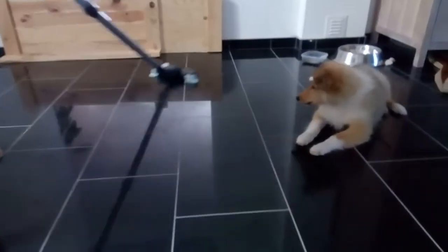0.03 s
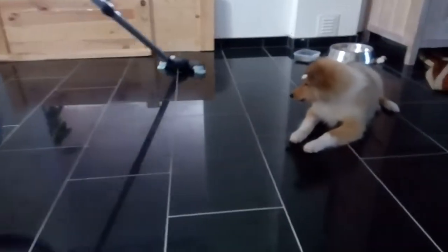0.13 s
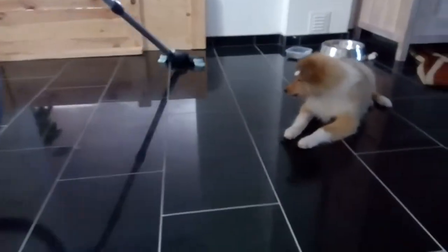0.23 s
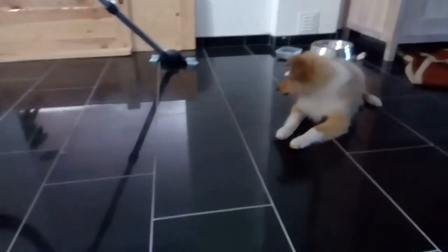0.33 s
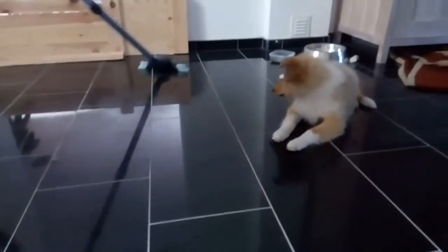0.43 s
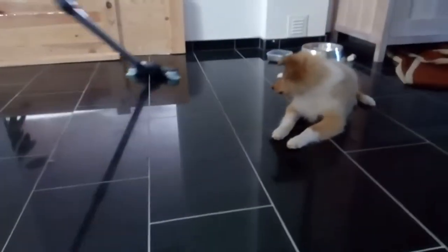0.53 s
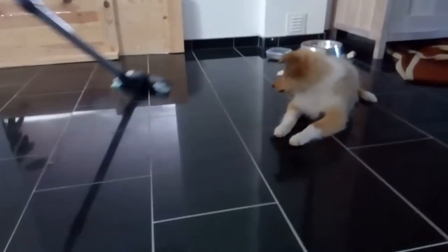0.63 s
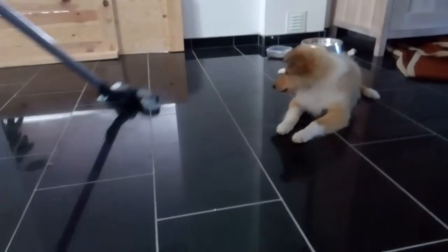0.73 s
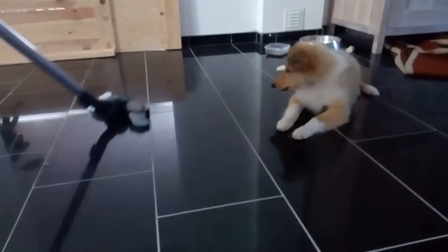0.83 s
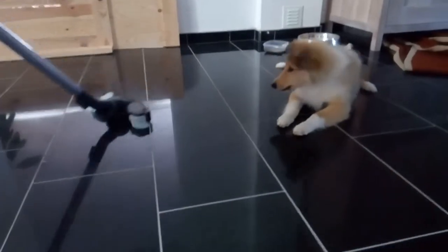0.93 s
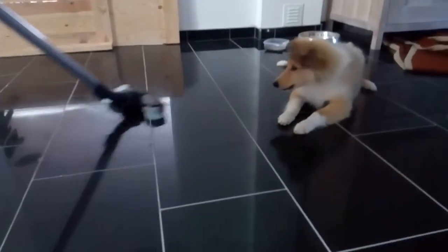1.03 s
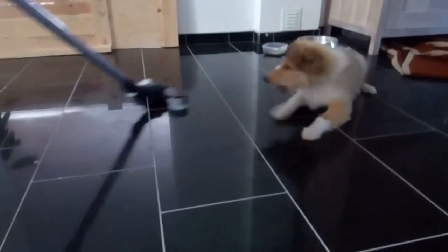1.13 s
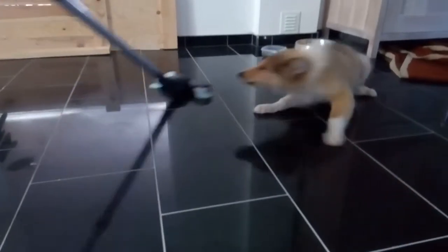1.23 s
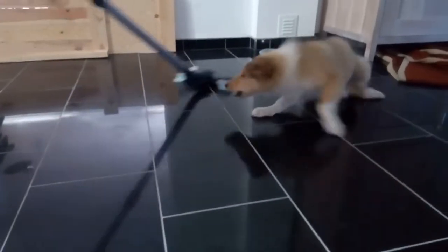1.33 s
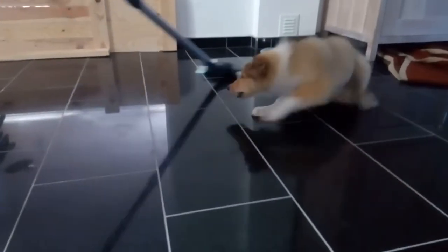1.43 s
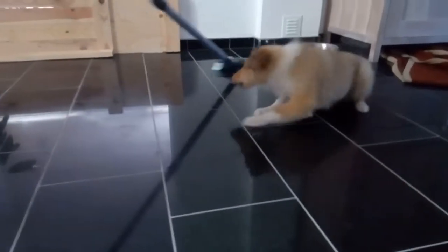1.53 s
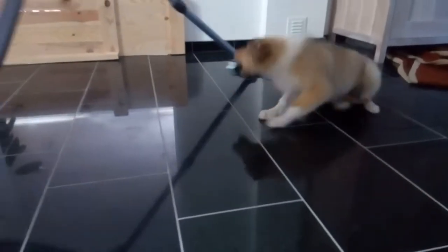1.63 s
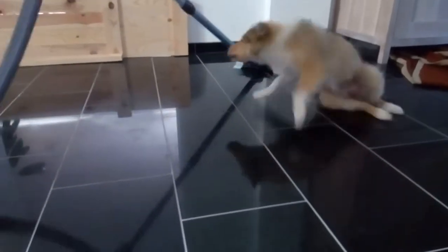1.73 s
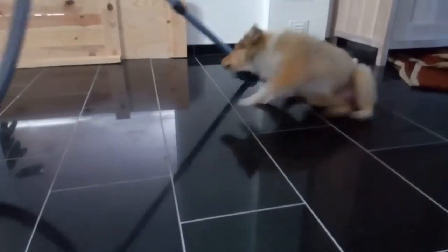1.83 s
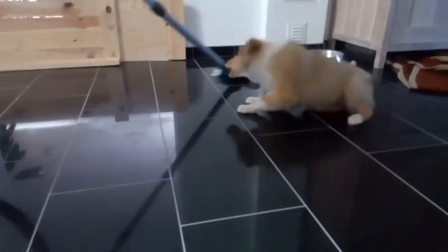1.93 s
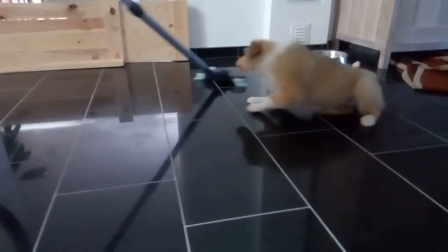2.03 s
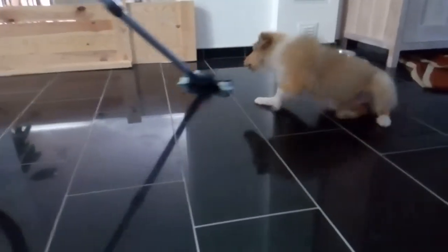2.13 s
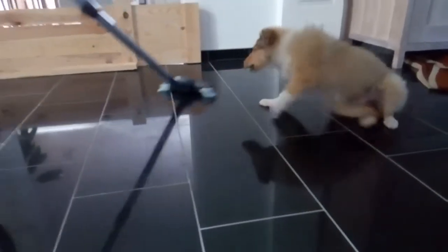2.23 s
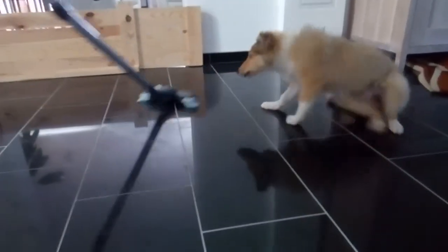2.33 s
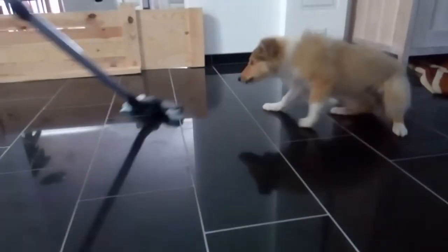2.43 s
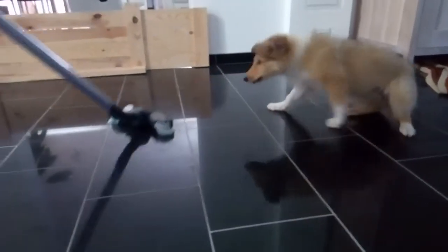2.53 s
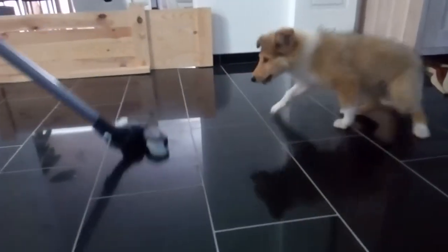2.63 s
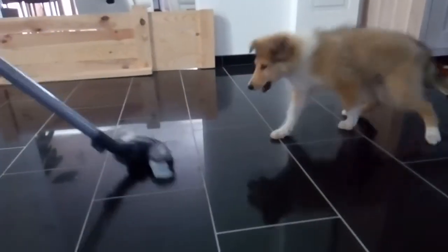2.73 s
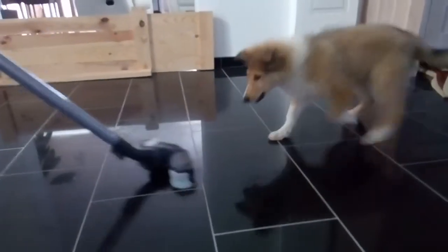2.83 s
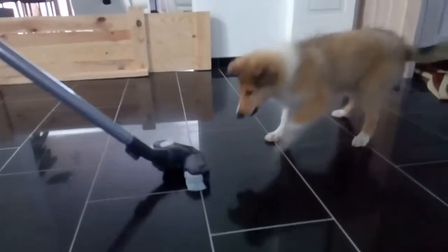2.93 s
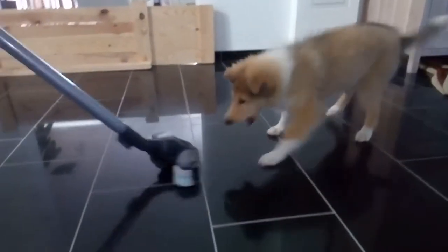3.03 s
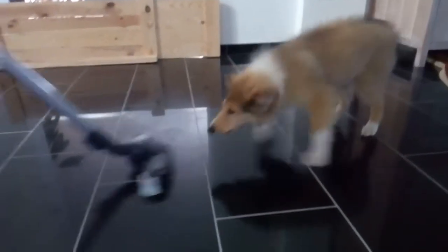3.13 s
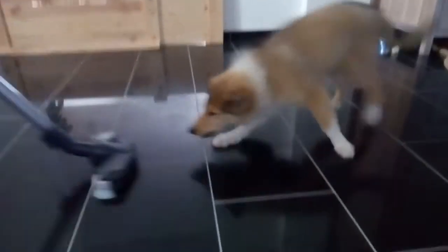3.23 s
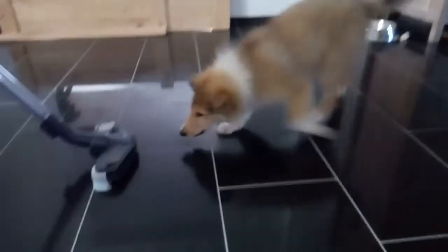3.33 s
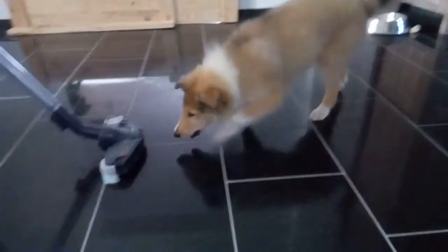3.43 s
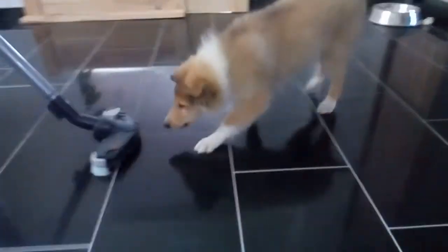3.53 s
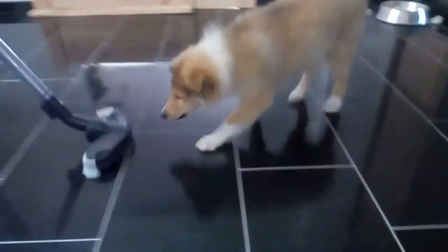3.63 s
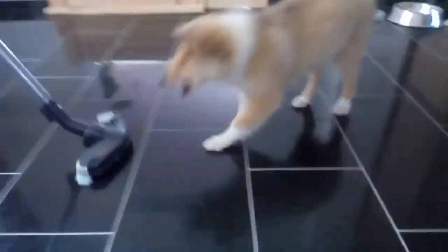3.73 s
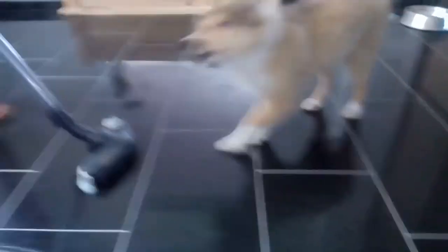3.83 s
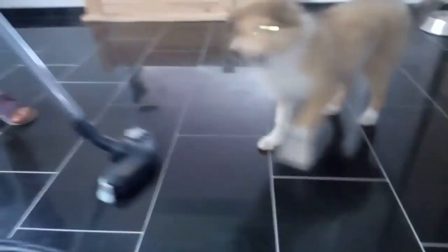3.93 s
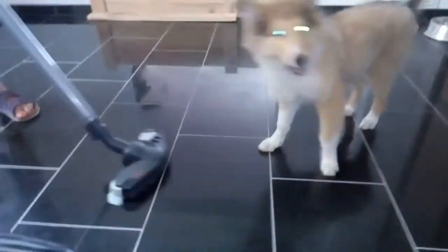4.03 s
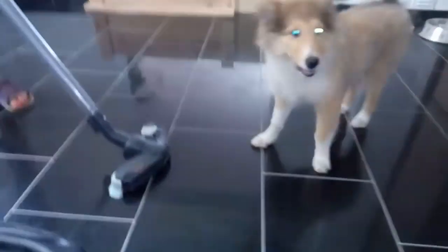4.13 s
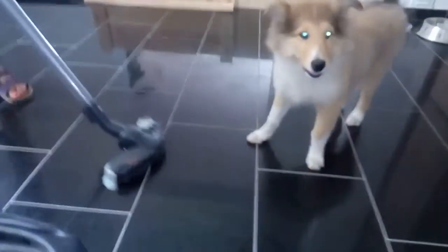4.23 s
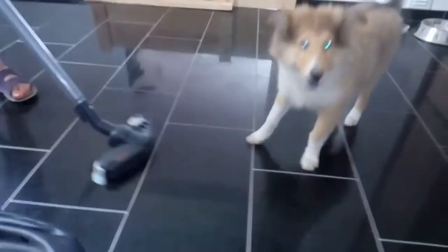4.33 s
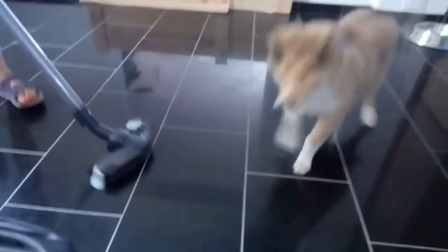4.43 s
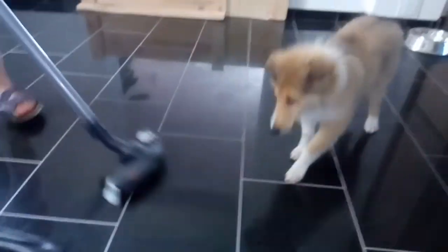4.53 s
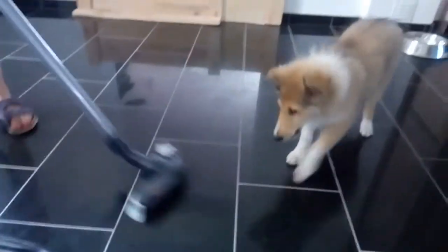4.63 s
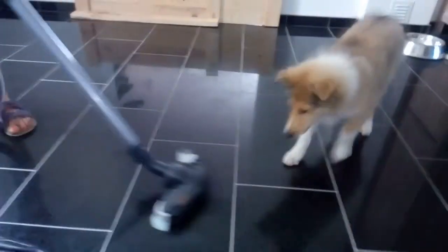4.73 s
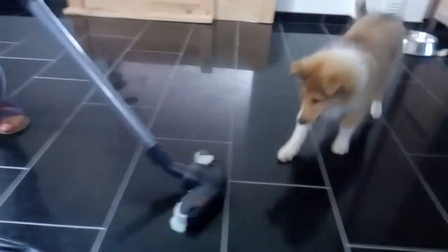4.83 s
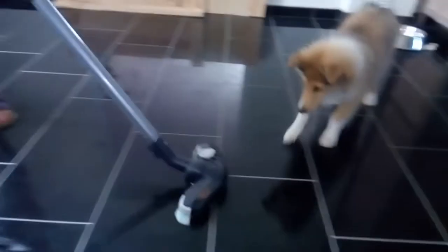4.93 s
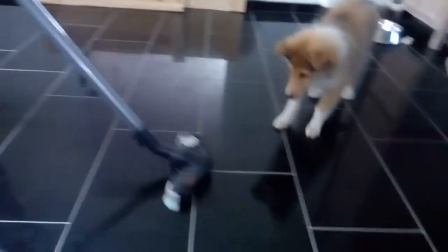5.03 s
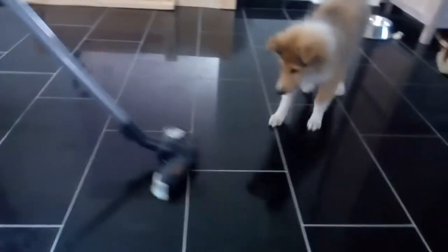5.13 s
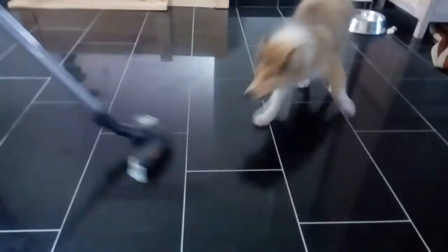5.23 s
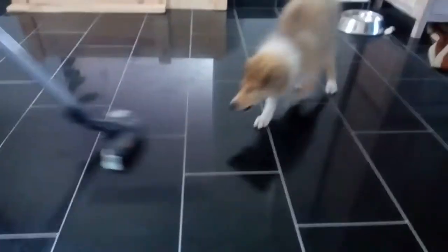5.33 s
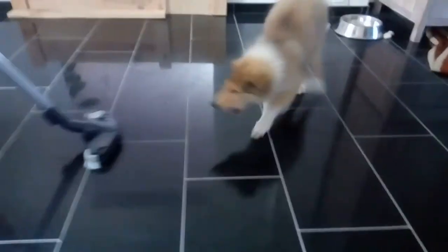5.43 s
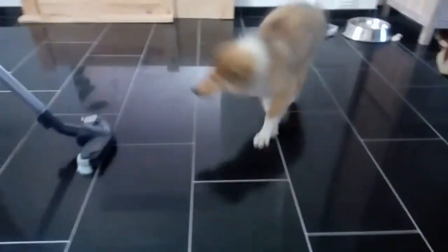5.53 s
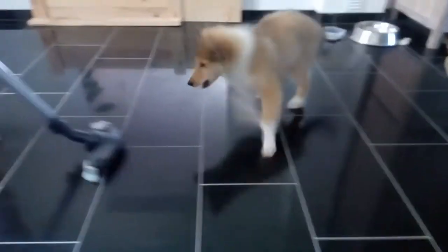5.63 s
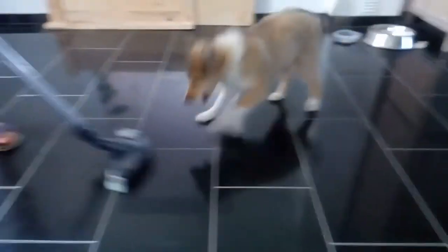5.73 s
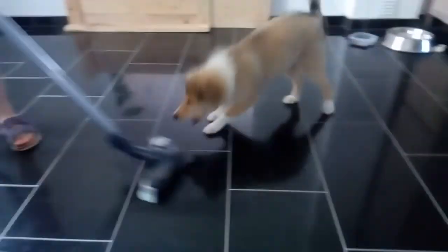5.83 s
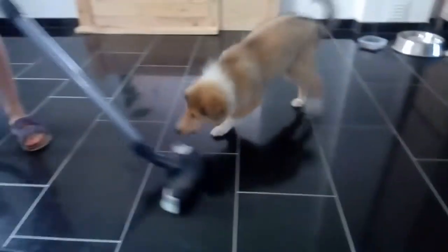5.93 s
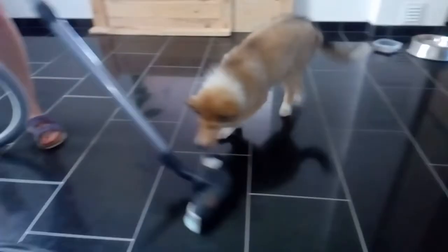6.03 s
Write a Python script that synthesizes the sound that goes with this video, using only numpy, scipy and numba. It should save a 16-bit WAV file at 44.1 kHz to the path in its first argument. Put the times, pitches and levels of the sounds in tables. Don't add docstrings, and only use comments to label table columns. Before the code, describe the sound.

In a bare, reverberant tiled room, a phone about two metres from a puppy catches its sharp yelps over a running vacuum. First only broad airy suction, then two yelps, a short whining cry, a pause, another hard yelp and later tight runs of barky cries. The cleaner's hollow drone rises briefly before the last cluster, and a final quick snap trails into a hum. The loudest yelps sound compressed and clipped.

```python
import sys
import numpy as np
from scipy import signal
from scipy.fft import rfft, irfft, next_fast_len
from scipy.io import wavfile
from scipy.ndimage import uniform_filter1d
from numba import njit

SR = 44100
rng = np.random.default_rng(int(sys.argv[2]) if len(sys.argv) > 2 else 0)


def to_linear_factor(level_db):
    exponent = np.asarray(level_db, float) / 20
    return 10 ** exponent


def digitize_waveform(pressure):
    field = np.atleast_2d(pressure).T
    bounded = np.clip(field, -1, 1)
    quanta = np.round(bounded * 32767).astype(np.int16)
    wavfile.write(sys.argv[1], SR, quanta)


N = 268569


def along(table, hz):
    f, v = np.transpose(table)
    return np.interp(np.log(np.maximum(hz, 1)), np.log(f), v)


def unit(x):
    return x / np.sqrt(np.mean(x ** 2))


def walk(rate, size=N):
    k = max(int(SR / rate), 1)
    smooth = uniform_filter1d(rng.standard_normal(size), k)
    return unit(uniform_filter1d(smooth, k))


def peak(f, hz, width):
    return 1 / np.sqrt(1 + ((f - hz * hz / f) / width) ** 2)


# (f/Hz, likeness 0-1)
LIKENESS = [(60, 0.6), (190, 0.86), (330, 0.76), (600, 0.59), (1010, 0.23), (1800, 0.13)]


def diffuse(size):
    f = np.arange(size // 2 + 1) * SR / size
    alike = np.clip(along(LIKENESS, f), 0, 1)
    mid, side = rfft(rng.standard_normal((2, size)))
    mid = mid * np.sqrt((1 + alike) / 2)
    side = side * np.sqrt((1 - alike) / 2)
    return f, np.array([mid + side, mid - side])


# (f/Hz, level/dB per Hz)
HISS_COLOUR = [(30, -36), (60, -24), (125, -18.5), (250, -14), (500, -5.5), (800, -1), (1600, -6.5),
               (3200, -10.5), (5000, -13), (6300, -20.5), (7200, -32.5), (9000, -43.5), (13000, -55.5),
               (16000, -55)]


def hiss(level_db):
    size = next_fast_len(N)
    f, noise = diffuse(size)
    air = unit(irfft(noise * to_linear_factor(along(HISS_COLOUR, f)), size)[:, :N])
    flutter_db = 0.5 * walk(3) + 0.4 * walk(30)
    return air * to_linear_factor(level_db + flutter_db)


# (f/Hz, width/Hz, level/dB)
PIPES = [(262.8, 22, 9.5), (396, 5.9, 2.5), (199, 150, -8)]


def drone(level_db):
    size = next_fast_len(N)
    f, noise = diffuse(size)
    pipes = sum(to_linear_factor(db) * peak(f + 1, hz, width) ** 2 for hz, width, db in PIPES)
    air = unit(irfft(noise * pipes, size)[:, :N])
    return air * to_linear_factor(level_db + 0.67 * walk(18))


# (f/Hz, level/dB rms)
MOTOR_TONES = [(689, -50.5), (2692, -51), (6616, -63)]


def motor():
    tones = 0
    for hz, db in MOTOR_TONES:
        level = to_linear_factor(db + 0.77 * walk(7.7))
        turns = hz * np.cumsum(1 + 0.001156 * walk(3.25)) / SR
        tones = tones + level * np.sin(2 * np.pi * turns)
    return np.sqrt(2) * tones


# (t/s, hiss level/dB, drone level/dB)
SUCTION = [
    (0, -29, -50.5),
    (1.1, -29, -53.5),
    (2.702, -29.5, -52.5),
    (3.404, -28.5, -46),
    (4.299, -28, -44),
    (4.85, -27.5, -37),
    (5.15, -28.5, -45),
    (6.09, -29, -55),
]


def vacuum():
    s, hiss_db, drone_db = np.transpose(SUCTION)
    t = np.arange(N) / SR
    return hiss(np.interp(t, s, hiss_db)) + drone(np.interp(t, s, drone_db)) + motor()


# (f/Hz, decay t/s)
ROOM_T60 = [(200, 0.51), (500, 0.37), (900, 1.05), (1500, 1.125), (2500, 1), (3800, 0.4), (7000, 0.2)]
# (f/Hz, level/dB)
ROOM_RING = [(808, 6.5), (940, -7.5), (1325, -20), (1492, 19), (1657, 10.5)]


def room(x, build_s=0.0033, lag_s=0.00022):
    size, wet_db, first_wall_s, ring_t60_s = 65536, -7, 0.014, 0.93
    f, noise = diffuse(size)
    t = np.arange(size) / SR
    log_bands = np.log(np.array(ROOM_T60)[:, 0])
    tail = 0
    for k, (_, t60) in enumerate(ROOM_T60):
        share = np.interp(np.log(f + 1), log_bands, np.arange(len(ROOM_T60)) == k)
        tail = tail + irfft(noise * share, size) * to_linear_factor(-60 * t / t60)
    ports = np.array([[0], [1]])
    for hz, db in ROOM_RING:
        cycles = hz * t + rng.random() + hz * lag_s * ports
        tail = tail + 0.018 * to_linear_factor(db - 60 * t / ring_t60_s) * np.sin(2 * np.pi * cycles)
    tail = tail * np.clip((t - first_wall_s) / build_s, 0, 1)
    response = to_linear_factor(wet_db) * unit(tail) / np.sqrt(size)
    response[0, int(lag_s * SR)] += 1
    response[1, 0] += 1
    return signal.fftconvolve(x[None], response, axes=1)[:, :N]


# (f/Hz, width/Hz, level/dB, fall f/Hz)
THROAT = (2919, 904, -18.5, 3770)


def yelp(rows, mouth_width=330, edge_s=0.0026):
    s, *columns = np.transpose(rows)
    first, last = int(s[0] * SR), min(int(s[-1] * SR), N)
    t = np.arange(first, last) / SR
    hz, db, mouth, odd_db, rough, treble_db = (np.interp(t, s, c) for c in columns)
    rough = np.clip(rough, 0, 1)
    shake = [walk(470, size=12000)[:len(t)] for _ in range(10)]
    phase = 2 * np.pi * np.cumsum(hz * (1 + 0.11 * rough * shake[0])) / SR
    throat_hz, throat_width, throat_db, fall_hz = THROAT
    effort_db = 0.45 * (db - 11.5)
    open_db = 0.6 * np.log2(mouth / 1400)
    bright = to_linear_factor(throat_db + treble_db + effort_db + open_db)
    hoarse = 0.16 * np.clip((mouth - 900) / 600, 0, 1)
    voice = 0
    for k in range(1, 8):
        f = k * hz
        gain = peak(f, mouth, mouth_width) ** 1.017
        gain = gain + bright * peak(f, throat_hz, throat_width) ** 2
        gain = gain + bright * to_linear_factor(-3.0 * (k + 4.5))
        gain = gain / (1 + (f / fall_hz) ** 14)
        unsteady = 1 - rough + 2.4 * rough * shake[k]
        voice = voice + gain * to_linear_factor(odd_db * (k % 2)) * unsteady * np.sin(k * phase)
        halfway = k + 0.5 * (-1) ** k
        voice = voice + gain * hoarse * shake[k + 1] * np.sin(halfway * phase)
    edge = np.clip(np.minimum(t - t[0], t[-1] - t) / edge_s, 0, 1)
    return first, np.sqrt(2) * voice * to_linear_factor(db) * edge


def syllable(row, shape):
    start_s, length_s, from_hz, to_hz, db = row
    share, glide, shape_db, mouth, odd_db, rough, treble_db = np.transpose(shape)
    hz = from_hz + (to_hz - from_hz) * glide
    return np.transpose([start_s + length_s * share, hz, db + shape_db, mouth * hz, odd_db, rough, treble_db])


def sing(rows, shape):
    track = np.zeros(N)
    for row in rows:
        first, voice = yelp(syllable(row, shape))
        track[first:first + len(voice)] += voice
    return track


# (t/s, length/s, from f/Hz, to f/Hz, level/dB)
GRUMBLES = [
    (1.861, .066, 441, 475, -23),
    (3.272, .074, 226, 221, -31),
    (5.331, .071, 690, 455, -19),
    (5.391, .061, 301, 291, -25),
]
# (share of length, share of glide, level/dB, mouth over pitch, odd partials/dB, roughness 0-1, treble/dB)
GRUMBLE_SHAPE = [(0, 0, -4, 1.12, 1.5, .22, -4), (.4, .5, 0, 1.15, 1.5, .15, -4),
                 (1, 1, -9, 1.25, 1.5, .28, -4)]


def grumbles():
    return sing(GRUMBLES, GRUMBLE_SHAPE)


# (t/s, length/s, from f/Hz, to f/Hz, level/dB)
WHIMPERS = [
    (2.372, 0.058, 548, 521, -22.5),
    (3.7, 0.0437, 435.7, 519, -14),
]
# (share of length, share of glide, level/dB, mouth over pitch, odd partials/dB, roughness 0-1, treble/dB)
WHIMPER_SHAPE = [(0, -0.3, -7.5, 3.7, 1.5, .08, 8), (.35, 0.55, 0.5, 4.37, 1.5, .1, 10),
                 (0.999, 1, -4, 4.4, 1.5, .15, 8)]


def whimpers():
    return sing(WHIMPERS, WHIMPER_SHAPE)


# (t/s, length/s, from f/Hz, to f/Hz, level/dB)
WHINES = [
    (2.01, 0.067, 945, 754, -6.5),
    (2.415, 0.098, 528.7, 375.3, -23),
    (3.23, 0.12, 548.4, 374.8, -22),
    (3.675, 0.071, 381, 444.5, -23.5),
    (3.82, 0.063, 1112, 762.5, -2.5),
]
# (share of length, share of glide, level/dB, mouth over pitch, odd partials/dB, roughness 0-1, treble/dB)
WHINE_SHAPE = [(0, 0.006, -7, 0.95, 1.3, 0.13, -11), (.3, .4, -1, 1.18, 0.88, 0.098, -7),
               (0.698, .88, -4, 1.35, 1.4, .12, -11), (1, 0.99, -9, 1.26, 1.45, 0.1, -10)]


def whines():
    return sing(WHINES, WHINE_SHAPE)


# (t/s, length/s, from f/Hz, to f/Hz, level/dB)
HUMS = [
    (1.348, .11, 803, 819, -8.5),
    (5.93, .1, 832.7, 773.4, -3),
]
# (share of length, share of glide, level/dB, mouth over pitch, odd partials/dB, roughness 0-1, treble/dB)
HUM_SHAPE = [(0, 0.014, -5, 1.3, 2, 0.022, -17), (.35, 0.234, 1.1, 1.3, 3.7, 0.038, -12),
             (.7, 0.615, -7, 1.03, 2.5, .14, -18), (1, 1, -10.5, 1.4, 3, 0.08, -17)]


def hums():
    return sing(HUMS, HUM_SHAPE)


# (t/s, length/s, from f/Hz, to f/Hz, level/dB)
SWELLS = [
    (1.938, .076, 628, 953, -6.5),
    (3.708, 0.071, 521, 888.5, -8),
    (5.445, .052, 562, 812.4, -7.5),
]
# (share of length, share of glide, level/dB, mouth over pitch, odd partials/dB, roughness 0-1, treble/dB)
SWELL_SHAPE = [(0, 0.0071, -15.5, 1.13, 2, 0.053, -11), (0.402, .7, -2.5, 1.095, 4.5, 0.061, -14),
               (.8, .97, 0.6, 1.25, 3, 0.06, -6.5), (1, 1, -3.5, 2.4, 0, .15, -8.5)]


def swells():
    return sing(SWELLS, SWELL_SHAPE)


# (t/s, length/s, from f/Hz, to f/Hz, level/dB)
ONSETS = [
    (1.153, 0.054, 772, 967.6, -3),
    (1.643, 0.03194, 788, 883, -1),
    (3.066, 0.037, 832, 957, 0),
]
# (share of length, share of glide, level/dB, mouth over pitch, odd partials/dB, roughness 0-1, treble/dB)
ONSET_SHAPE = [(0, 0, -9.5, 1.1, -1, .02, -5), (.35, .6, -3, 1.1, 4, .04, 13.5),
               (.75, 0.8, -2.7, 1.12, -1, 0, 7.5), (1, 0.97, -1, 0.64, 3, 0.4, 6)]


def onsets():
    return sing(ONSETS, ONSET_SHAPE)


# (t/s, length/s, from f/Hz, to f/Hz, level/dB)
YIPS = [
    (5.195, .038, 698.7, 929.5, 1),
    (5.877, 0.0298, 973, 1173, 0),
]
# (share of length, share of glide, level/dB, mouth over pitch, odd partials/dB, roughness 0-1, treble/dB)
YIP_SHAPE = [(0, 0, -9, 1.4, -2, .06, -11), (.4, .62, -3.5, 1.73, 3.5, 0.029, -9.5),
             (.65, 1, -1, 1.5, 6, .06, -10), (1, .96, -2.5, 1.28, 3.5, .24, -11)]


def yips():
    return sing(YIPS, YIP_SHAPE)


# (t/s, length/s, from f/Hz, to f/Hz, level/dB)
CRIES = [
    (1.704, 0.071, 788.2, 597.3, -2),
    (1.902, 0.033, 761, 746, -9),
    (3.138, 0.0457, 942.5, 839.4, -6),
    (3.168, .04, 732, 474.6, -9.5),
    (3.785, 0.037, 867, 581, -6),
    (5.278, 0.049, 879, 608.5, -1.5),
    (5.556, .1, 667.8, 660.4, -5.5),
]
# (share of length, share of glide, level/dB, mouth over pitch, odd partials/dB, roughness 0-1, treble/dB)
CRY_SHAPE = [(0, 0, 0, 2.15, -2, .25, 5), (.4, .4, -4, 2.1, 0.5, 0.13, 4),
             (.75, .85, -4.5, 2.05, -36, .25, 1.5), (1, 1, -8.5, 2.8, -29, 0.55, 1.3)]


def cries():
    return sing(CRIES, CRY_SHAPE)


# (t/s, length/s, from f/Hz, to f/Hz, level/dB)
SHOUTS = [
    (3.768, 0.046, 1044, 1118, -8),
    (5.224, .056, 760.7, 885.5, 1),
    (5.497, .068, 734.5, 844.6, -2.5),
    (6.03, 0.074, 742.5, 769, -11.5),
]
# (share of length, share of glide, level/dB, mouth over pitch, odd partials/dB, roughness 0-1, treble/dB)
SHOUT_SHAPE = [(0, 0.043, -3, 2.1, -15.5, 0.14, 2.9), (.3, .45, -0.7, 2.09, -0.5, 0.11, 4.4),
               (0.998, 1, -2, 2.03, -6.5, .1, 2.5)]


def shouts():
    return sing(SHOUTS, SHOUT_SHAPE)


# (t/s, length/s, from f/Hz, to f/Hz, level/dB)
SNAPS = [
    (1.194, .085, 820, 645, 0),
    (1.668, 0.0419, 645.6, 789.4, -5),
    (3.096, .046, 745, 955, 4.5),
    (5.897, 0.0292, 665, 755, 0.3),
]
# (share of length, share of glide, level/dB, mouth over pitch, odd partials/dB, roughness 0-1, treble/dB)
SNAP_SHAPE = [(0, 0, -5.5, 2.35, -3, .15, 11), (.22, .28, 0, 2.25, -7, .06, 14),
              (.65, .76, -2.5, 2.12, -19, .07, 11), (1, 1, -3.5, 2.64, -21, 0.24, 7.1)]


def snaps():
    return sing(SNAPS, SNAP_SHAPE)


def puppy():
    quiet = grumbles() + whimpers() + whines() + hums()
    rising = swells() + onsets() + yips()
    wide_open = cries() + shouts() + snaps()
    return quiet + rising + wide_open


def scene():
    return vacuum() + room(puppy() * to_linear_factor(-0.1))


# (f/Hz, left minus right level/dB)
PORTS = [(60, -0.5), (840, 2), (1300, 2), (2010, -8), (3100, -4), (5000, -11.5), (12000, -32)]


def microphones(x):
    size = next_fast_len(N)
    tilt = along(PORTS, np.arange(size // 2 + 1) * SR / size) / 2
    return irfft(rfft(x, size) * to_linear_factor(np.array([tilt, -tilt])), size)[:, :N]


@njit
def follow(x, attack, release):
    y, e = np.empty(len(x)), 0.
    for i in range(len(x)):
        e += (x[i] - e) * (attack if x[i] > e else release)
        y[i] = e
    return y


def limiter(x):
    limit_db, ratio, attack_s, release_s = -0.5, 2.9, 0.00081, 0.023
    loud = follow(np.abs(x).max(axis=0), 1 / (attack_s * SR), 1 / (release_s * SR))
    return x * np.maximum(loud / to_linear_factor(limit_db), 1) ** (1 / ratio - 1)


def roll_off(x):
    return signal.sosfilt(signal.butter(12, 15300, fs=SR, output="sos"), x)


def record(dry):
    limited = limiter(microphones(dry))
    return roll_off(np.clip(limited, -1, 1))


dry = scene()
out = record(dry)
digitize_waveform(out)
```